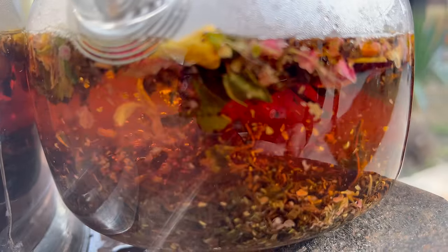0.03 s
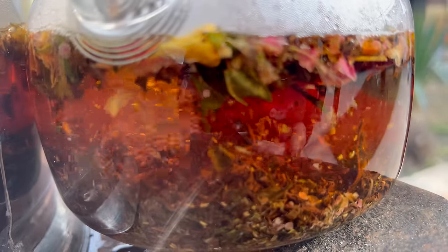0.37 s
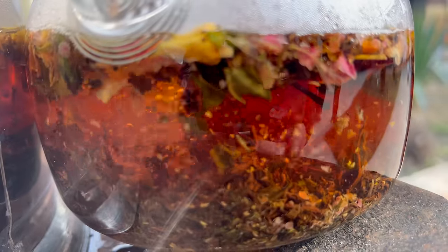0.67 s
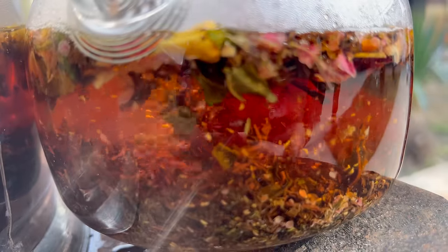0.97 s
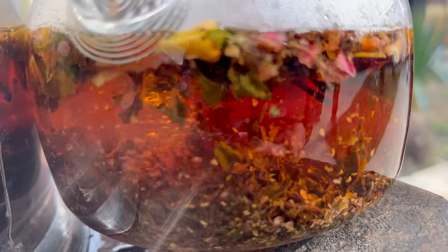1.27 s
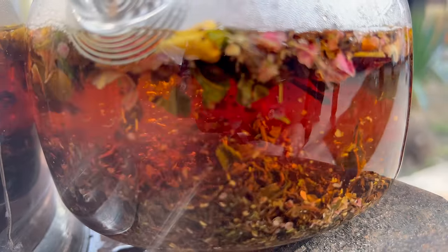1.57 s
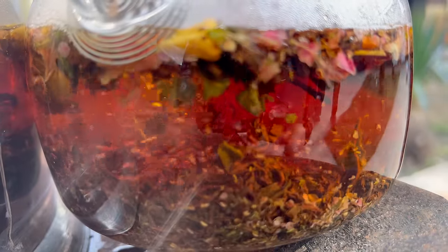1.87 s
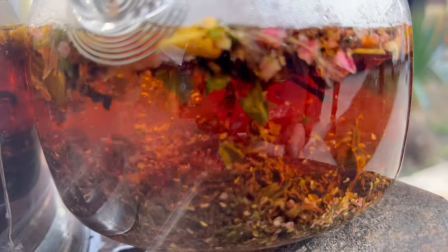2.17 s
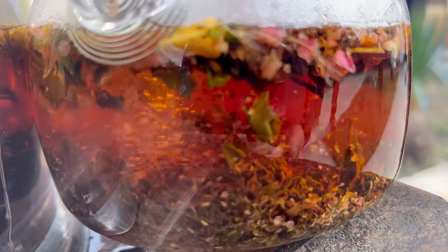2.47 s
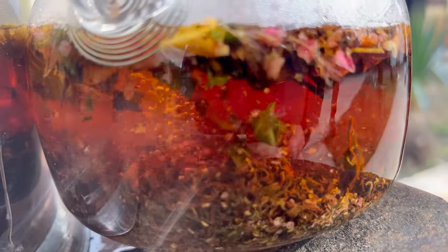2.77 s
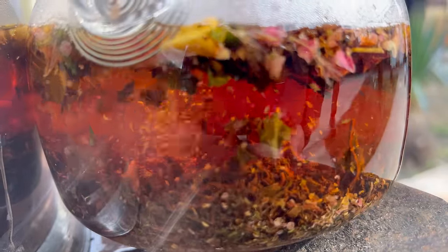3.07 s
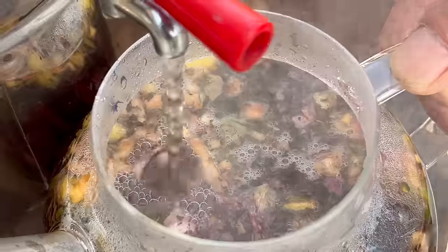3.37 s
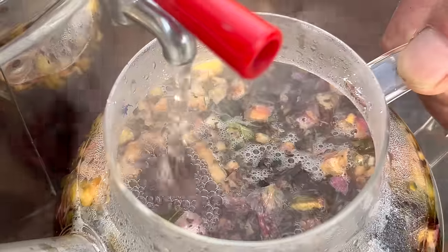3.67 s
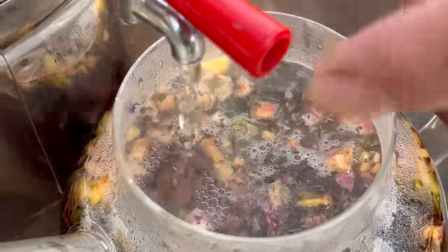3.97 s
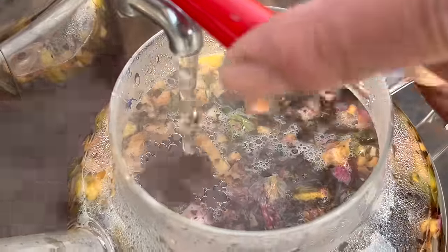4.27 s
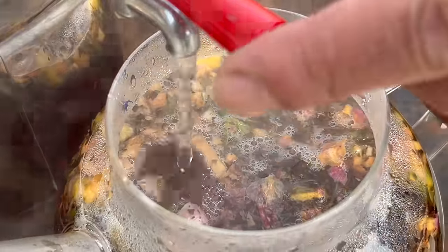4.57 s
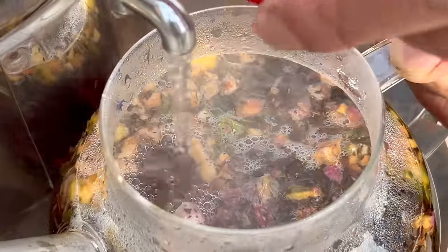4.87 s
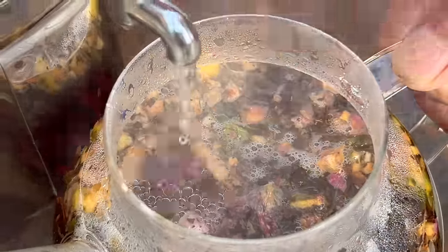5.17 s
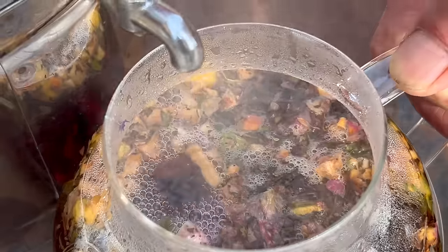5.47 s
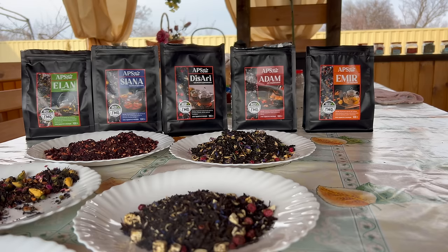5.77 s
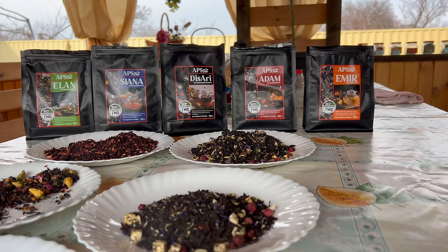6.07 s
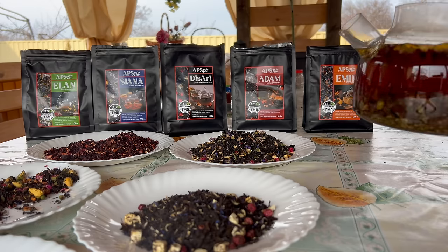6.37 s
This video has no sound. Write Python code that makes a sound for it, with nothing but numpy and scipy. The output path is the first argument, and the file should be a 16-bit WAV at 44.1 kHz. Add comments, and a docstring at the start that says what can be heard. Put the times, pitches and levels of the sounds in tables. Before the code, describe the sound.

Water runs from a tap into a glass teapot of loose tea, heard close, with low gurgles, small plips and fine spatter. About halfway a sharp click marks a shift from beside the pot to above it, where the bubbling sounds drier and foam fizzes faintly. Near the end a second click cuts the pour off, leaving quiet outdoor air, faint rustles and a soft wooden bump.

```python
"""Hot water runs from a tap into a glass teapot of loose tea, heard beside the pot, then from above it. The jet
drags air under, and each bubble rings as a spring of air loaded by water: big ones gulp, small ones plip. Spray
spatters, foam fizzes and escaping air briefly whistles. A sharp pop marks each change of place; at last, on a
quiet veranda, something wooden is softly bumped."""
import sys
import numpy as np
from scipy import signal
from scipy.fft import rfft, irfft
from scipy.io import wavfile

SR = 44100
rng = np.random.default_rng(int(sys.argv[2]) if len(sys.argv) > 2 else 0)


def waveform_to_disk(signal):
    """Save audio, clipped to [-1, 1], as 16-bit WAV at the path in sys.argv[1]."""
    frames = np.transpose(np.atleast_2d(signal))
    scaled = np.clip(frames, -1, 1) * 32767
    samples = np.round(scaled).astype(np.int16)
    wavfile.write(sys.argv[1], SR, samples)


N = 287532
TIME = np.arange(N) / SR
ABOVE_S, VERANDA_S = 3.3414, 5.6104   # the listener moves above the pot, then to the veranda
# spectrum of a drop striking water: (frequency [Hz], relative level [dB])
IMPACT_SPECTRUM = [(250, -20.5), (600, 13), (1200, 5.5), (2000, 6), (2500, 1.5), (3100, 2.5), (4200, -0.5),
                   (6000, -5.5), (6800, -9.5), (7800, -14.5), (11000, -25), (15000, -24)]


def from_db(db):
    """The decibel scale: 20 dB is a factor of ten in amplitude."""
    return 10 ** (np.asarray(db) / 20)


def rms_one(x):
    """Normalisation to unit mean power."""
    return x / np.sqrt(np.mean(x ** 2) + 1e-20)


def add(out, s, sound):
    """Superposition: a short sound joins the mix at time s."""
    i = min(max(int(s * SR), 0), N - 1)
    out[i:i + len(sound)] += sound[:N - i]


def envelope(start_s, level_db, attack_s, hold_s, release_s):
    """Exponential decay after a linear rise and a hold."""
    age = TIME - start_s
    decay = np.exp(-np.maximum(age - attack_s - hold_s, 0) / release_s)
    return from_db(level_db) * np.clip(age / attack_s, 0, 1) * decay


def swells(rows):
    """Incoherent addition: overlapping envelopes sum in power."""
    return np.sqrt(sum(envelope(*row) ** 2 for row in rows))


def colour(x, points, size=16384):
    """Minimum-phase filtering through (Hz, dB) points; white noise keeps its power."""
    hz, level_db = np.transpose(points)
    bin_hz = np.arange(size // 2 + 1) * SR / size
    gain = rms_one(from_db(np.interp(np.log(bin_hz + 1), np.log(hz), level_db)))
    cepstrum = irfft(np.log(gain))
    cepstrum[1:size // 2] *= 2   # folding the cepstrum makes the filter causal
    cepstrum[size // 2 + 1:] = 0
    response = irfft(np.exp(rfft(cepstrum)))[:size // 2]
    return signal.oaconvolve(x, response)[:N]


def ring(x, hz, t60):
    """A damped mode: a unit impulse starts a unit sine that falls 60 dB in t60 seconds."""
    r, w = np.exp(-np.log(1000) / (t60 * SR)), 2 * np.pi * hz / SR
    return signal.lfilter([0, np.sin(w)], [1, -2 * r * np.cos(w), r * r], x + 1e-18)


def resonance(x, hz, width_hz):
    """A driven resonator passes one band, with unit gain at its peak."""
    r, w = np.exp(-np.pi * width_hz / SR), 2 * np.pi * hz / SR
    return signal.lfilter(np.array([1, 0, -1]) * (1 - r * r) / 2, [1, -2 * r * np.cos(w), r * r], x + 1e-18)


def drift(per_s):
    """Random modulation: Gaussian values joined by straight lines."""
    return np.interp(TIME * per_s, np.arange(2000), rng.standard_normal(2000))


def grains(per_s, spread_db):
    """Shot noise: independent clicks of uneven size; rms 1."""
    chance, size, sign = rng.random((3, N))
    born, out = chance < per_s / SR, np.zeros(N)
    out[born] = np.sign(sign[born] - .5) * from_db(spread_db * np.minimum(-np.log(size[born]), 4))
    return rms_one(out)


def spurts(per_s, fade_s, share):
    """Amplitude modulation: a share of the power comes in sudden, fading splashes; rms 1."""
    starts = (rng.random(N) < per_s / SR) * np.minimum(rng.exponential(1, N), 3)
    power = signal.lfilter([1], [1, -np.exp(-1 / (fade_s * SR))], starts + 1e-18)
    return np.sqrt(1 - share + share * power / power.mean())


def bubble(hz, swell_cycles, glide, softness=2):
    """A bubble's volume oscillation swells and decays, rising in pitch; low softness starts abruptly."""
    cycles = np.arange(int(12 * SR / hz)) * hz / SR
    age = cycles / swell_cycles
    phase = 2 * np.pi * cycles * (1 + glide * (cycles - 2 * swell_cycles))
    return (age * np.exp(1 - age)) ** softness * np.sin(phase)


def swarm(hz, octaves, per_s, spread_db, swell_cycles, count=16):
    """Random superposition of bubbles, their pitches spread binomially about hz; rms 1."""
    births, dealt = grains(per_s, spread_db), rng.binomial(count, .5, 4096)
    pitches = [hz * 2 ** (octaves * (k - count / 2) / 2) for k in range(count + 1)]
    shapes = [bubble(pitch, swell_cycles, glide=0.00734) for pitch in pitches]
    out = np.zeros(N)
    for i in np.flatnonzero(births):
        add(out, i / SR, births[i] * shapes[dealt[i % len(dealt)]])
    return rms_one(out)


def single_bubbles(rows, swell_cycles, glide, softness=2):
    """Free oscillation of one bubble per row (time [s], pitch [Hz], level [dB])."""
    out = np.zeros(N)
    for s, hz, peak_db in rows:
        add(out, s, from_db(peak_db) * bubble(hz, swell_cycles, glide, softness))
    return out


def strays(hz, octaves, peak_db, spread_db, count):
    """Random scatter of faint bubbles heard above the pot: rows (time [s], pitch [Hz], level [dB])."""
    when, pitch, size = rng.random((count, 3)).T
    s = ABOVE_S + (VERANDA_S - ABOVE_S) * (np.arange(count) + when) / count
    return list(zip(s, hz * 2 ** (octaves * (pitch - .5)), peak_db + spread_db * (size - .5)))


def air(level_db=-58.5):
    """Stationary noise: still outdoor air and a faint hiss."""
    # background spectrum: (frequency [Hz], relative level [dB])
    spectrum = [(30, -5.5), (80, 5), (150, -6.5), (280, 3.5), (500, -3), (780, -6), (1100, -12.5),
                (2000, -15.5), (3400, -19.5), (4400, -19), (6500, -22.5), (10000, -24.5), (15500, -26.5)]
    return from_db(level_db) * colour(rng.standard_normal(N), spectrum)


def rustle():
    """Amplitude-modulated noise: faint rustles on the veranda."""
    # rustles: (start [s], level [dB], attack [s], hold [s], release [s])
    stirs = [(5.6, -65.5, 0.05214, 0.1636, 0.0544), (5.78, -60.5, 0.13094, 0.02035, 0.0636),
             (6.2, -62.5, 0.04906, 0.00982, 0.0241)]
    # their spectrum: (frequency [Hz], relative level [dB])
    spectrum = [(800, 7), (2200, -4), (2900, 4), (3500, -10), (4400, 3.5), (5000, -2.5), (6000, -16),
                (12000, -26.5)]
    return swells(stirs) * colour(rng.standard_normal(N), spectrum)


def bump(soft_hz=900):
    """Impact excitation: a padded double knock rings the wood's modes; loose things scuff and rattle."""
    # contacts: (time [s], level [dB])
    contacts = [(6.218, -43.5), (6.243, -44)]
    # modes of the wood: (frequency [Hz], gain [dB], t60 [s])
    wood_modes = [(116, 4.5, 0.25), (241, -12, 0.246), (290, -5, 0.1999), (344.7, -17, 0.098)]
    # modes of the loose things: (frequency [Hz], relative gain [dB], t60 [s])
    loose_modes = [(915.1, -16, .05), (1005, -9, 0.1), (1262, -6, 0.1568), (1415, -13.5, 0.06),
                   (1508.1, -15.5, .06), (1820, -18, 0.206)]
    # spectrum of the scuff: (frequency [Hz], relative level [dB])
    scuff_spectrum = [(100, 3.5), (320, 9), (520, -10), (1000, -7.5), (1550, -8.5), (2200, -27),
                      (8000, -43.5)]
    blows = np.zeros(N)
    for s, level_db in contacts:
        add(blows, s, from_db([level_db]))
    blows = signal.sosfilt(signal.butter(2, soft_hz, fs=SR, output="sos"), blows + 1e-18)
    thud = sum(from_db(db) * ring(blows, hz, t60) for hz, db, t60 in wood_modes)
    shake = envelope(start_s=6.207, level_db=-4.5, attack_s=.02, hold_s=.05, release_s=.036)
    chatter = shake * grains(per_s=2500, spread_db=1.8855)
    rattle = from_db(-77) * sum(from_db(db) * ring(chatter, hz, t60) for hz, db, t60 in loose_modes)
    return thud + rattle + from_db(-42) * colour(chatter, scuff_spectrum)


def pops(sag_db=-28, kick_db=-34, sag_s=0.0066918, hold_s=0.0057172, settle_s=0.003038):
    """A step is broadband: at each change of place the level sags, snaps across zero with a pop and settles."""
    out = np.zeros(N)
    for s in (ABOVE_S, VERANDA_S):
        age = TIME - s
        sag = np.clip((age + sag_s) / (sag_s - hold_s), 0, 1)
        settle = np.clip(1 - age / settle_s, 0, 1)
        out += np.where(age < 0, -from_db(sag_db) * sag, from_db(kick_db) * settle)
    return out


def whistle(hz=4060, waver_hz=28):
    """A flow-driven tone: air squeezed through a small gap sings one thin, unsteady note."""
    pitch = hz + waver_hz * drift(per_s=130)
    level_db = -62.5 + 3.56 * drift(per_s=80)
    gain = envelope(3.42, level_db, attack_s=.025, hold_s=.07, release_s=.015)
    return gain * np.sin(2 * np.pi * np.cumsum(pitch) / SR)


def churn_db(above, beside_db, above_db, follows):
    """Source strength: a layer's level at each listening place follows the churning of the jet."""
    # churning about its usual strength: (time [s], level [dB])
    churn = [(0.04, 0), (0.48, -2.5), (0.8, 1), (0.93, -4), (1.07, 2.5), (1.56, -2.5), (2.02, 2),
             (2.15, -3.5), (2.4, 1.5), (2.8, -0.5), (3.0, -2), (3.25, -1.5), (3.58, 0.5), (3.8, -3),
             (4.36, 2.5), (4.95, -3), (5.3, 0), (5.58, -2.5)]
    return np.where(above, above_db, beside_db) + follows * np.interp(TIME, *np.transpose(churn))


def impacts(rows):
    """Impact transients: each drop ticks on meeting the surface, as its bubble starts to ring."""
    clicks = np.zeros(N)
    for s, _, level_db in rows:
        add(clicks, s, from_db([level_db]))
    return colour(clicks, IMPACT_SPECTRUM)


def drips():
    """Air entrainment by drops: each falls back with a tick and traps a tiny, ringing bubble."""
    # the clearest drops: (time [s], pitch [Hz], relative level [dB])
    clear = [(0.091, 6488, -48), (0.142, 2021, -46), (2.472, 5580, -45.5), (2.615, 6923, -45),
             (2.856, 1935, -36.5), (2.979, 3224, -44), (4.059, 5288, -46), (4.520, 2590, -47),
             (4.686, 6985, -45.5), (4.759, 3128, -45.5), (4.942, 4208, -48), (5.186, 2680, -48),
             (5.350, 2327, -47), (5.540, 2543, -47.5)]
    rows = clear + strays(hz=3300, octaves=1.335, peak_db=-49.5, spread_db=3, count=10)
    ringing = single_bubbles(rows, swell_cycles=1.206, glide=0.002, softness=0.642)
    return from_db(-2.5) * ringing + from_db(11) * impacts(rows)


def spray(above, foam_boost_db=2.5):
    """Shot noise of spurting droplets and bursting foam; from above, tiny bubbles patter too."""
    # spray beside the pot: (frequency [Hz], relative level [dB])
    beside_spectrum = [(700, -27), (1150, 0), (1450, 6), (1750, 3), (2080, 2), (2400, -3.5), (2750, -3),
                       (2970, -0.5), (3400, -1), (4600, -1.5), (6000, -6.5), (6800, -13), (7800, -9.5),
                       (14000, -30)]
    # spray above the pot: (frequency [Hz], relative level [dB])
    above_spectrum = [(700, 0.5), (1300, 9), (1700, 1), (2250, 4), (2700, 6.5), (3300, -3.5), (4050, 3),
                      (4700, -3), (5600, -1), (7500, -8), (14000, -24.5)]
    # bursting foam: (frequency [Hz], relative level [dB])
    foam_spectrum = [(3000, -24), (4400, -3), (5200, 1), (5800, 5.5), (6300, 4.5), (6800, -4), (7500, -7),
                     (10000, -22), (15000, -39)]
    # patches of foam fizzing away: (start [s], level [dB], attack [s], hold [s], release [s])
    patches = [(3.3, -68.5, 0.0715, 0.2718, 0.1008), (3.62, -66, 0.1857, 0.0763, 0.1045),
               (4.95, -71, 0.1345, 0.4804, .1), (5.29, -64.5, 0.102, 0.02936, 0.0471)]
    droplets = spurts(per_s=64, fade_s=0.005476, share=0.49246) * grains(per_s=4500, spread_db=3)
    beside_pot = from_db(3) * colour(droplets, beside_spectrum)
    patter = from_db(-5.5) * swarm(hz=2567.7, octaves=0.1803, per_s=180, spread_db=2, swell_cycles=1.699)
    ticks = from_db(-11) * swarm(hz=4961.6, octaves=0.392, per_s=110, spread_db=0.5, swell_cycles=1.271)
    over_pot = from_db(3) * colour(droplets, above_spectrum) + patter + ticks
    fizz = swells(patches)
    foam = fizz * colour(grains(per_s=10000, spread_db=3.5), foam_spectrum)
    level_db = churn_db(above, beside_db=-64, above_db=-66, follows=0.316)
    level_db += foam_boost_db * fizz / fizz.max()   # more spray at the height of the fizz
    return from_db(level_db) * np.where(above, over_pot, beside_pot) + foam


def spits(rise_share=0.1723, tail_share=1.3749, split_hz=4000):
    """Jet break-up throws quick showers of droplets, each with its own balance of middle and treble."""
    # showers: (time [s], relative level [dB], length [s], treble minus middle [dB])
    showers = [(0.137, -48.5, 0.011236, -4), (0.284, -46, 0.005724, -20.5), (0.543, -50, 0.00711, -25.5),
               (1.022, -51.5, 0.002885, 24), (1.061, -54, 0.025, -2), (1.305, -46.5, 0.01192, -15.5),
               (1.397, -49, 0.003605, -6), (1.486, -44, 0.00976, -4), (1.689, -51, 0.01188, 4.5),
               (1.934, -50.5, 0.008095, -4), (1.973, -50.5, 0.01351, -3.5), (2.227, -53.5, 0.00564, 18.5),
               (2.498, -50.5, 0.01002, -11.5), (2.568, -52.5, 0.00459, -13), (2.856, -39.5, 0.002111, -4.5),
               (2.98, -54, 0.00518, 9), (3.606, -53.5, 0.013, -9), (3.711, -49.5, 0.0071, -4.5),
               (4.314, -51, 0.00672, -7), (4.652, -48, 0.002347, -9.5), (4.911, -50, 0.002663, -25.5)]
    middle, treble = np.zeros(N), np.zeros(N)
    for s, level_db, length, bright_db in showers:
        t = np.arange(-2 * length, 10 * length, 1 / SR)
        shape = np.exp(np.where(t < 0, t / (rise_share * length), -t / (tail_share * length)))
        shower = from_db(level_db) * shape / np.hypot(1, from_db(bright_db))
        add(middle, s - 2 * length, shower)
        add(treble, s - 2 * length, shower * from_db(bright_db))
    drops = colour(grains(per_s=5000, spread_db=3.5), IMPACT_SPECTRUM)
    low = signal.sosfiltfilt(signal.butter(2, split_hz, fs=SR, output="sos"), drops)
    return from_db(1) * middle * rms_one(low) + from_db(0.6004) * treble * rms_one(drops - low)


def in_pot(x, above):
    """Reflection and cavity resonance colour the spatter from the side; from above it arrives direct."""
    # echoes between the glass walls: (delay [s], level [dB])
    echoes = [(.0011, -27), (.0023, -14), (.0041, -12.5), (.0067, -16.5)]
    # cavity modes: (frequency [Hz], bandwidth [Hz], gain [dB])
    modes = [(1329.5, 256.3, -9), (2028.3, 68.45, 2), (2925.1, 273.6, -3.5), (4711.4, 195.4, -13),
             (6741.3, 194.5, 5.5)]
    bounced = x + sum(from_db(db) * np.interp(TIME - delay, TIME, x) for delay, db in echoes)
    rung = sum(from_db(db) * resonance(bounced, hz, width_hz) for hz, width_hz, db in modes)
    return np.where(above, x, from_db(-1.5) * (bounced + rung))


def surface_bubbles(beside_hz=815, above_hz=1150, scatter_octaves=0.1):
    """Size sets pitch, so like bubbles plip alike: rows (time [s], pitch [Hz], relative level [dB])."""
    # the clearest small bubbles: (time [s], relative level [dB])
    plips = [(0.2994, -39), (0.6158, -35), (0.895, -41), (1.3012, -36), (1.3221, -40), (1.4707, -35.5),
             (1.5048, -35), (1.686, -36), (1.779, -36.5), (1.8407, -39), (1.9294, -40), (1.9435, -33),
             (2.2353, -36), (2.3671, -36.5), (2.4707, -39), (2.569, -38), (2.8515, -36.5), (2.9623, -38),
             (3.2599, -35), (3.3643, -39), (3.5755, -39), (3.6248, -39), (3.8241, -45.5), (4.02, -45),
             (4.1271, -41.5), (4.2682, -45), (4.3381, -34), (4.3867, -37.5), (4.4703, -44), (4.6526, -38),
             (4.797, -45.5), (4.8432, -45), (4.9125, -46), (5.0795, -42.5), (5.326, -46)]
    scatter = 2 ** (scatter_octaves * rng.standard_normal(len(plips)))
    clear = [(s, (above_hz if s > ABOVE_S else beside_hz) * k, db) for (s, db), k in zip(plips, scatter)]
    return clear + strays(above_hz, octaves=0.5, peak_db=-50, spread_db=6, count=14)


def babble(above, plip_rows):
    """Small bubbles resonate: from the side through the pot's cavity, from above short and dry."""
    gain = from_db(churn_db(above, beside_db=-58.5, above_db=-65, follows=0.728))
    plips = single_bubbles(plip_rows, swell_cycles=0.6036, glide=0.00665, softness=0.574)
    small = gain * swarm(hz=817.81, octaves=0.36744, per_s=550, spread_db=3.5, swell_cycles=0.9683)
    hollow = resonance(small + from_db(-8.5) * plips, hz=822, width_hz=40)
    beside_pot = from_db(-6) * small + from_db(-4) * plips + from_db(5.5) * hollow
    direct = gain * swarm(hz=1077.4, octaves=0.3601, per_s=260, spread_db=2.5, swell_cycles=0.925)
    over_pot = from_db(-3.5) * direct + from_db(2.2) * plips
    return np.where(above, over_pot, beside_pot)


def gurgle(above, trail_s=0.022, trail_ratio=0.9, trail_db=-8):
    """Air entrainment by the jet: big bubbles ring and drive the pot's cavity; the water heaves below."""
    # the biggest bubbles torn off the jet: (time [s], pitch [Hz], relative level [dB])
    gulps = [(0.5447, 358.7, -38.5), (0.6487, 423.9, -38), (0.8279, 302.1, -31.5), (1.0306, 362.4, -38),
             (1.296, 291.2, -33), (1.471, 492.2, -38), (1.5034, 439.2, -37.5), (1.5613, 343.1, -34),
             (1.6944, 333.2, -31), (1.7396, 409.7, -36.5), (1.9399, 322.2, -34), (1.982, 275, -31.5),
             (2.2819, 351.2, -31.5), (2.4489, 280.4, -36.5), (2.5321, 313.1, -38.5), (2.5671, 368.4, -36.5),
             (2.806, 331.1, -26.5), (3.5495, 308.4, -36.5), (3.8532, 301.5, -35), (4.0158, 344.3, -29.5),
             (4.0797, 303.3, -35.5), (4.1291, 283.6, -34.5), (4.2848, 262, -31), (4.4596, 284.8, -35.5),
             (4.527, 269.4, -36.5), (5.1075, 365.9, -34.5), (5.3669, 333, -33), (5.5252, 259.8, -38)]
    # modes of the air in the pot: (frequency [Hz], bandwidth [Hz], gain beside [dB], gain above [dB])
    modes = [(285, 24, -9.5, -11.5), (467, 28, -5, -30), (545, 30, -30, -1), (795, 35, -15, 6)]
    gain = from_db(churn_db(above, beside_db=-52.5, above_db=-51, follows=1.0195))
    beside_pot = swarm(hz=345, octaves=0.42934, per_s=480, spread_db=2.5, swell_cycles=1.0499)
    over_pot = swarm(hz=316, octaves=0.31, per_s=400, spread_db=1.9, swell_cycles=1.4266)
    water = gain * np.where(above, over_pot, from_db(-0.7) * beside_pot)
    # each gulp pinches off with a higher plop, and a weaker bubble trails it
    plops = [(s + 0.0016515, 2.1656 * hz, db) for s, hz, db in gulps]
    trailing = [(s + trail_s, trail_ratio * hz, db + trail_db) for s, hz, db in gulps]
    water += from_db(-2.4) * single_bubbles(gulps + trailing, swell_cycles=1.2809, glide=0.0027)
    water += from_db(-15) * single_bubbles(plops, swell_cycles=0.9125, glide=0.0035, softness=1.544)
    heave = gain * swarm(hz=120.75, octaves=0.15607, per_s=150, spread_db=1, swell_cycles=1.5098)
    hollow = sum(from_db(np.where(above, above_db, beside_db)) * resonance(water, hz, width_hz)
                 for hz, width_hz, beside_db, above_db in modes)
    return water + hollow + from_db(-7) * heave


def scene():
    """Superposition of all sources: the pour from two places, then the veranda."""
    above = TIME > ABOVE_S
    plip_rows = surface_bubbles()
    drops = drips() + from_db(0.5) * impacts(plip_rows)
    bubbles = gurgle(above) + babble(above, plip_rows)
    spatter = in_pot(spray(above) + spits(), above)
    pour = bubbles + spatter + drops + whistle()
    return (pour * (TIME < VERANDA_S) + air() + rustle() + bump() + pops())[None]


def record(dry):
    """Band limiting: a steep low-pass cuts the top, and the signal rides on a steady offset."""
    cutoff_hz, offset = 15800, -.0971
    return signal.sosfilt(signal.ellip(10, .1, 70, cutoff_hz, fs=SR, output="sos"), dry) + offset


dry = scene()
out = record(dry)
waveform_to_disk(out)
```